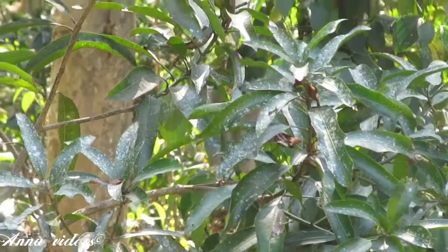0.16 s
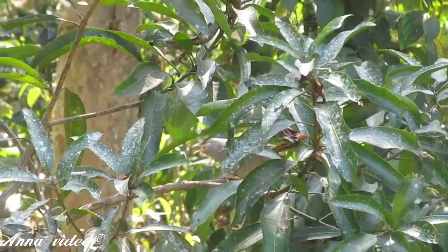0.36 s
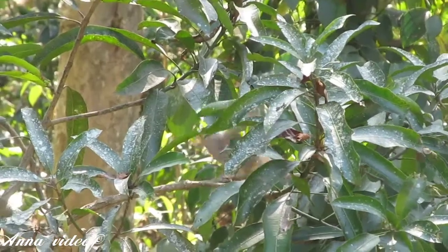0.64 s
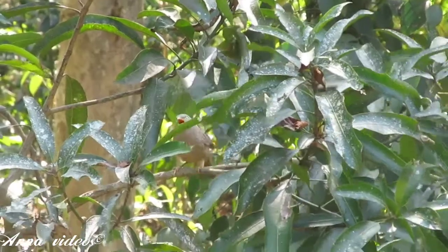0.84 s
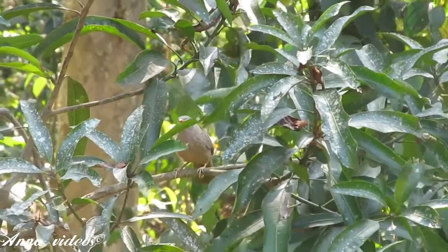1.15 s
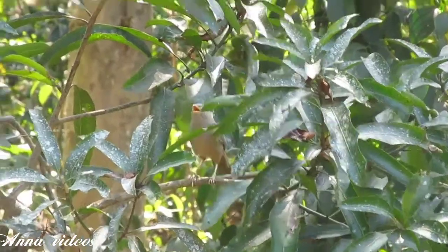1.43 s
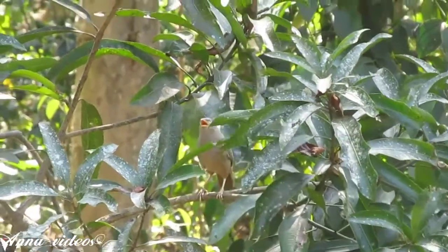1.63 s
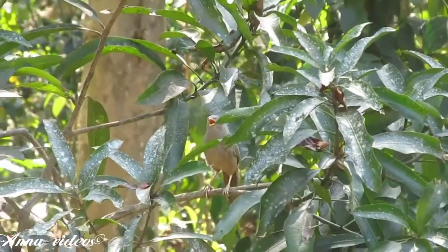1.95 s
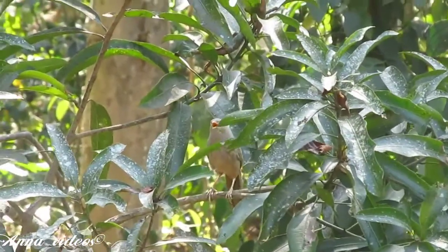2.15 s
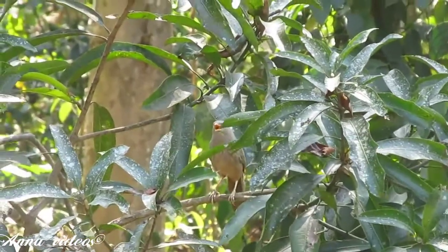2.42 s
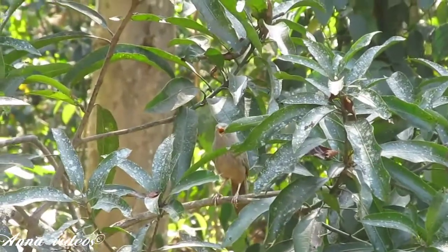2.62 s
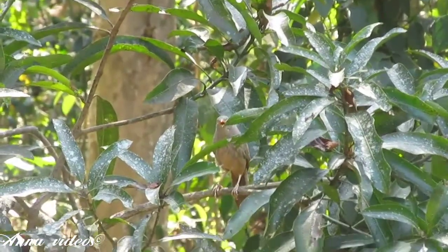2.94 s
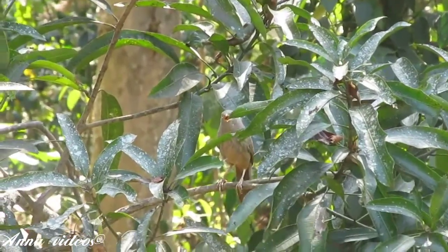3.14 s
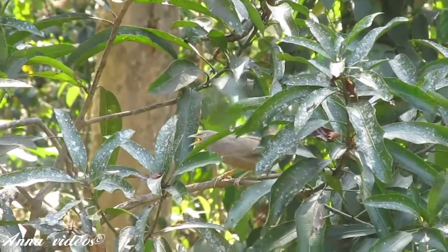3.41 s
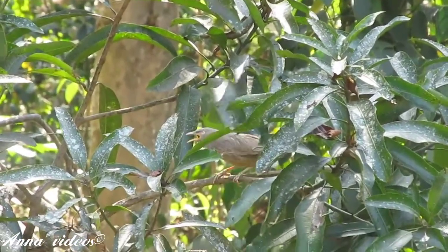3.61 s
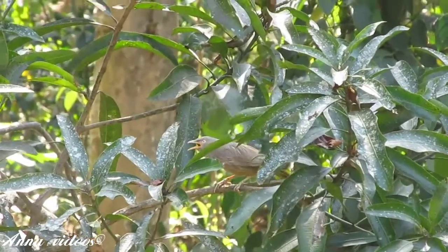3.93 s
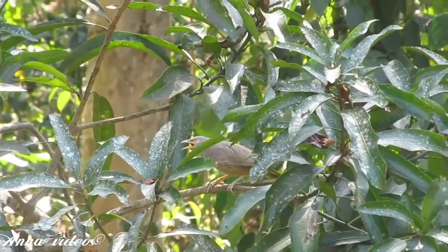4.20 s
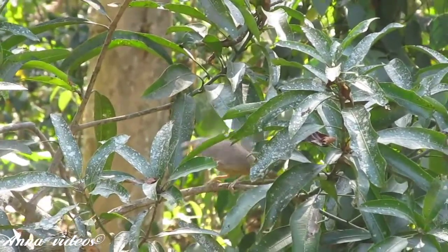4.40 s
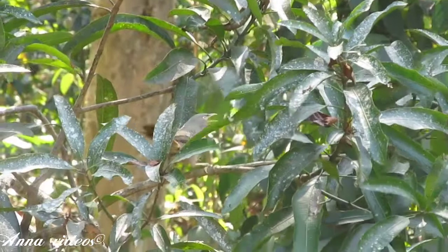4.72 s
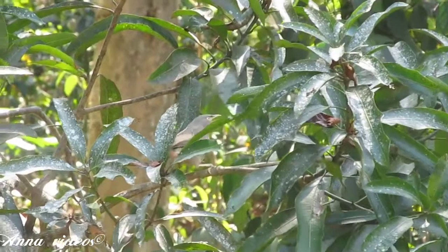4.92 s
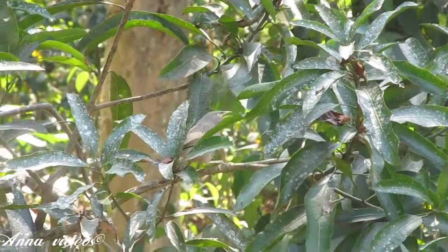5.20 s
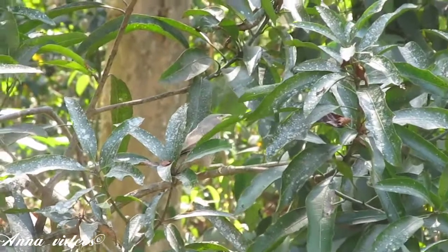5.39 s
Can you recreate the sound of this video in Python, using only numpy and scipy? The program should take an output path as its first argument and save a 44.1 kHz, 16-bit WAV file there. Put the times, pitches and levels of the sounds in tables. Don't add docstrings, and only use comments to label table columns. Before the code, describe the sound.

Outdoor stereo camera sound of one agitated bird: hoarse and ringing notes with overtones, quick scratchy chatter, a tiny twig tick, five slower grating rasps with a low squawk, then strong whistles again and a fast chatter run. Faint gritty ghost tones cling to the calls. Soft traffic rumble and airy hiss continue; a far crow and rasp close it.

```python
import sys
import numpy as np
from scipy import signal
from scipy.fft import rfft, irfft
from scipy.io import wavfile
from scipy.ndimage import uniform_filter1d

SR = 44100
rng = np.random.default_rng(int(sys.argv[2]) if len(sys.argv) > 2 else 0)


def amplitude_ratio(level_db):
    exponent = np.asarray(level_db, float) / 20
    return 10 ** exponent


def store_wav(level_fs):
    pcm = np.round(np.clip(np.atleast_2d(level_fs), -1, 1) * 32767)
    wavfile.write(sys.argv[1], SR, pcm.T.astype(np.int16))


N = 244755
T = np.arange(N) / SR

# (start [s], length [s], top pitch [Hz], level [dB], rise time [s])
LONG = [
    (.630, .136, 2323, -13, .018),
    (4.516, .1, 2388, -12, .013),
]
RINGING = [
    (.843, .074, 2362, -12, 0.01065),
    (1.330, .087, 2295, -13, 0.00944),
]
SLIDING = [
    (3.438, .068, 2392, -12.5, .021),
    (3.775, .078, 2382, -13.5, .021),
]
FLAT = [
    (3.612, .075, 2158, -19, .017),
]
LAST = [
    (4.698, .051, 2258, -22, .009),
]
HOARSE = [
    (.291, .117, 2458, -13.5, .015),
]
CHIRP = [
    (.502, .045, 2139, -27.5, .02),
]
SQUAWK = [
    (2.648, .095, 1590, -23.5, .01),
]
CLUCKS = [
    (1.011, 0.0221, 1398, -32.5, 0.0087),
    (4.295, .031, 1484, -33, 0.01175),
    (4.421, .032, 1493, -31, .014),
]
KINDS = [LONG, RINGING, SLIDING, FLAT, LAST, HOARSE, CHIRP, SQUAWK, CLUCKS]

# (rise [share 0-1], sag [share 0-1], sag exponent, closing slur against note level [dB])
PITCH_ARCH = [(.32, .05, 2.8, -9.5), (.32, .06, 1.5, -6), (.3, .05, 2.993, -9), (.31, 0.02, 2.49, -4),
              (.24, .07, 2.5, -2), (0.31, .08, 2.4, -10.5), (.24, .16, 2.3, 2.5), (0.04, .1, 2.5, -6.5),
              (0.4, .05, 2.407, -6)]
# (first [dB], second [dB], third [dB], fourth [dB])
HELD_PARTIALS = [(0, 0.0031, 1.5, 8.5), (1, 0, 4, 17.5), (-3.5, 0, 0.5, 7), (0, 0.0061, -0.5, -1.5),
                 (6, 0.0044, 7, 9.5), (-1.5, 0, 4, 0), (-2.5, 0.0062, -6, -11.5), (-3.75, 0, -6, -9.5),
                 (1, 0.01, -7.5, -7.5)]
PITCH_ROUGHNESS = [.002, .002, .006, .005, .004, .014, .01, .028, .012]
# (loudest moment [share 0-1], start below peak [dB], end below peak [dB])
BREATH_EFFORT = [(0.87, 8.5, 2), (0.54, 9, 4), (0.85, 10.5, -0.5), (0.61, 6.5, 6), (0.5, 2, 2),
                 (0.29, 6.5, 5), (0.42, -4, -3.5), (0.12, 1, 9.5), (0.8, 8, 10.5)]

# (start [s], length [s], peak level [dB], centre [Hz], loudest moment [share 0-1])
RASPS = [(.045, 0.191, -26, 4131, 0.73), (.273, 0.0368, -16.5, 4400, 1), (1.837, 0.1916, -23, 4290, 0.71),
         (2.099, 0.1214, -27.5, 4240, 0.47), (2.316, 0.178, -22.5, 4090, 0.53),
         (2.579, 0.194, -22, 4607, 0.4), (2.834, .146, -24.5, 4129, 0.51),
         (3.104, 0.1805, -23.5, 4056, 0.59), (3.358, 0.1207, -16, 4550, 1), (3.59, 0.058, -22, 4779, 0.92)]
CHATTER = [(1.01, 0.0572, -22, 4750, 0.31), (1.128, 0.052, -25.5, 4920, 0.28),
           (1.228, 0.0699, -24, 4910, 0.587), (1.505, 0.0549, -23, 4590, 0.33),
           (1.632, 0.0465, -32, 4670, 0.29), (3.945, 0.0559, -24.5, 4830, 0.32),
           (4.053, 0.061, -25.5, 4890, 0.39), (4.175, 0.0578, -27, 4760, 0.488),
           (4.3, 0.0613, -26.5, 4860, 0.3015), (4.428, 0.0564, -26, 4810, 0.44),
           (4.72, 0.0747, -27, 4500, 0.9), (4.845, 0.0497, -28.5, 4860, 0.3)]
FAR_RASP = [
    (5.03, 0.107, -53, 4056, 0.173),
]

# (frequency [Hz], level [dB])
THROAT = [(800, -24), (1500, -15.5), (2300, -4.5), (3300, -11), (4500, 4.5), (5800, 0.5), (7000, -17),
          (9500, -27.5), (14000, -25.5)]
RASP_TINT = [(900, -15), (1400, -7), (1950, 0.5), (2500, -7), (3080, -7), (3500, -10.5), (4200, -3.5),
             (4900, -10.5), (5700, -8.5), (6600, -31), (9000, -25.5), (15000, -47.5)]
CHATTER_TINT = [(900, -14.5), (1500, -6.5), (3000, -6), (3800, -8.5), (5000, 4.5), (6600, -4),
                (7700, -17.5), (15000, -24.5)]

# (time [s], peak level [dB])
TWIG_TICKS = [
    (1.7855, -28),
]
# (time [s], level [dB])
CROW_LEVEL = [(5.11, -46.5), (5.156, -38), (5.2, -44), (5.224, -46.5), (5.428, -58.5), (5.436, -70),
              (5.45, -64)]

# (frequency [Hz], level per Hz [dB])
GARDEN_SPECTRUM = [(15, -47), (25, -22), (148, -2.5), (183, -2.5), (289, -6.5), (378, -5), (614, -15.5),
                   (703, -15), (1080, -18), (1170, -19), (1530, -17.5), (3260, -18.5), (15500, -36.5)]
# (time [s], level [dB])
BACKGROUND_LEVEL = [(0, -0.5), (.3, -1), (3, 0.5), (5.55, 0.5)]
# (frequency [Hz], level [dB])
HUMS = [(378, -54.5), (1147, -59.5), (7865, -67.5)]
# (time [s], level [dB])
WIND_PUFFS = [
    (3.951, -40.5),
]

# (frequency [Hz], left minus right [dB])
PORT_DIFFERENCE = [(60, 0.5), (110, -6), (200, -3), (380, -2.5), (700, -2.5), (1290, -1.5), (2380, -8),
                   (4400, -1.5), (8120, -10), (15000, -4.5)]
# (frequency [Hz], level [dB])
GHOST_TINT = [(1000, -21.5), (2300, -4.5), (4500, 0), (7000, 1), (9000, -31.5)]
WHINE_LEVELS = [-19.5, -26, -29, -36]


def curve(table, hz):
    f, v = np.transpose(table)
    return np.interp(np.log(np.maximum(hz, 1)), np.log(f), v)


def tint(x, table):
    n = x.shape[-1]
    gain = amplitude_ratio(curve(table, np.fft.rfftfreq(n, 1 / SR)))
    return irfft(rfft(x) * gain, n)


def unit(x):
    return x / np.sqrt(np.mean(x ** 2))


def wobble(n, hz):
    lowpass = signal.butter(2, hz, fs=SR, output="sos")
    return unit(signal.sosfilt(lowpass, rng.standard_normal(n)))


def effort(start, length, peak_db, crest, swell_db, fall_db):
    at = np.arange(int(start * SR), int((start + length) * SR))
    u = (T[at] - start) / length
    crest = np.clip(crest, .05, .98)
    before = swell_db * (1 - u / crest) ** 2
    after = fall_db * ((u - crest) / (1 - crest)) ** 2
    return at, peak_db - np.where(u < crest, before, after)


def notes(slur_s=.036, slur_drop=.62, tilt_db=-4.0, shimmer_db=.7, hoarse=.16, leak_db=-22):
    out = np.zeros(N)
    k = np.arange(1, 8)[:, None]
    breath = unit(tint(rng.standard_normal(N), CHATTER_TINT))
    u = np.arange(int(slur_s * SR)) / (slur_s * SR)
    manners = zip(KINDS, PITCH_ROUGHNESS, PITCH_ARCH, BREATH_EFFORT, HELD_PARTIALS)
    for rows, rough, (rise, sag, sag_power, slur_db), push, held_db in manners:
        for start, length, top_hz, peak_db, rise_s in rows:
            at, push_db = effort(start, length, peak_db, *push)
            held = len(at)
            t = T[:held]
            leap = rise * np.exp(-(t / rise_s) ** 1.25)
            hz = top_hz * (1 - leap - sag * (t / length) ** sag_power)
            hz = np.r_[hz, hz[-1] * (1 - slur_drop * np.tanh((u / .3) ** 1.3))]
            span = slice(at[0], at[0] + len(hz))

            colour_db = curve(THROAT, k * hz) + tilt_db * np.log2(k)
            db = colour_db + peak_db + slur_db + 6.5
            db[:, :held] = colour_db[:, :held] - colour_db[1, :held].max() + push_db
            db[:, :held] += np.r_[held_db, [min(held_db[3], 0)] * 3][:, None]
            db[3:, :held] -= 7 * np.exp(-(t / (2 * rise_s)) ** 2)
            db[2, :held] += 6.5 * np.exp(-t / .0122 - ((3 * hz[:held] - 5317) / 380) ** 2)
            db[1:] += 1.5 * wobble(N // 10, 35)[-len(hz):]
            db = uniform_filter1d(db, 120, axis=1, mode="nearest")

            drift = np.r_[rough + .012 * np.exp(-t / .015), rough + hoarse * u ** 2]
            drift = drift * wobble(len(hz), 220)
            phase = 2 * np.pi * np.cumsum(hz * (1 + drift)) / SR
            shimmer = shimmer_db + 50 * rough
            db += np.array([shimmer * min(j, 2) * wobble(len(hz), 169) for j in k[:, 0]])
            whistle = np.sqrt(2) * np.sum(amplitude_ratio(db) * np.sin(k * phase), axis=0)
            leak = amplitude_ratio(leak_db + db[1]) * breath[span]
            gate = np.r_[np.minimum(np.arange(held) / 420, 1), (1 - u) ** .8]
            out[span] += gate * (whistle + leak)
    return out


def harsh(rows, colour, jitter, clean_db, pulse_hz, scatter_db, fade_s, swell_db, fall_db, low_db):
    clicks = (rng.random(N) < pulse_hz / SR) * amplitude_ratio(scatter_db * rng.standard_normal(N))
    chop = unit(uniform_filter1d(uniform_filter1d(clicks, 30), 30) + .03)
    spray = clicks * rng.choice([-1, 1], N) + .3 * rng.standard_normal(N)
    spray = tint(spray, colour)
    low = unit(signal.sosfilt(signal.butter(4, 3300, fs=SR, output="sos"), spray))
    high = unit(signal.sosfilt(signal.butter(4, 3300, "high", fs=SR, output="sos"), spray))
    out = np.zeros(N)
    for start, length, peak_db, centre_hz, crest in rows:
        at, db = effort(start, length, peak_db, crest, swell_db, fall_db)
        edge = np.clip(np.minimum(T[at] - start, start + length - T[at]) / fade_s, 0, 1)
        push = db - peak_db
        hz = centre_hz * (1 - .0028 * push)
        phase = np.pi * np.cumsum(hz * (1 + jitter * wobble(len(at), 465.6))) / SR
        tone = amplitude_ratio(clean_db + .93 * push) * chop[at]
        upper = high[at] + tone * (np.sin(2 * phase) + amplitude_ratio(-17) * np.sin(3 * phase))
        lower = low[at] + amplitude_ratio(-13) * tone * np.sin(phase)
        lower = amplitude_ratio(low_db + .566 * (db + 28)) * lower
        out[at] += edge * amplitude_ratio(-3.5) * (amplitude_ratio(db) * upper + lower)
    return out


def rasps():
    return harsh(RASPS, RASP_TINT, jitter=.036, clean_db=3.0, pulse_hz=2000, scatter_db=2.0,
                 fade_s=.02, swell_db=8, fall_db=8.5, low_db=-33)


def chatter():
    return harsh(CHATTER, CHATTER_TINT, jitter=.06, clean_db=-2.0, pulse_hz=2500, scatter_db=2.0,
                 fade_s=.012, swell_db=14.5, fall_db=19, low_db=-29.5)


def twig(t60=0.0214):
    out = np.zeros(N)
    for s, db in TWIG_TICKS:
        i = int(s * SR)
        out[i:i + 600] += amplitude_ratio(db - 60 * T[:600] / t60) * rng.standard_normal(600)
    return tint(out, [(500, -28), (1500, 7.5), (6000, 2), (9000, -17), (15000, -30)])


def far_rasp():
    return harsh(FAR_RASP, RASP_TINT, jitter=0.0415, clean_db=11.5, pulse_hz=1520, scatter_db=-4.5,
                 fade_s=0.024, swell_db=-0.5, fall_db=7.5, low_db=-31)


def crow(pulse_hz=151.0, throat_hz=1850, width_hz=110):
    s, level_db = np.transpose(CROW_LEVEL)
    at = np.arange(int(s[0] * SR), int(s[-1] * SR))
    edge = np.clip(np.minimum(T[at] - s[0], s[-1] - T[at]) / 0.0134, 0, 1)
    phase = np.cumsum(pulse_hz * (1 + 0.0082 * wobble(len(at), 53))) / SR
    pulses = np.diff(np.floor(phase), prepend=0) + 0.056 * rng.standard_normal(len(at))
    throat = signal.butter(2, [throat_hz - width_hz, throat_hz + width_hz], "band", fs=SR, output="sos")
    chest = signal.butter(2, [1280, 1480], "band", fs=SR, output="sos")
    voice = unit(signal.sosfilt(throat, pulses)) + amplitude_ratio(-7) * unit(signal.sosfilt(chest, pulses))
    out = np.zeros(N)
    out[at] = edge * amplitude_ratio(np.interp(T[at], s, level_db)) * voice
    return out


def foliage(x, direct, leaves_db, leaves_t60, walls_db, walls_t60):
    t = T[:SR]
    leaves = rng.standard_normal((2, SR)) * amplitude_ratio(-60 * t / leaves_t60) * np.minimum(t / 0.0039, 1)
    walls = tint(rng.standard_normal((2, SR)),
                 [(500, 11.5), (2000, -0.5), (5000, 0), (8000, -2.5), (15000, -20.5)])
    walls = walls * amplitude_ratio(-60 * t / walls_t60) * np.minimum(t / 0.00856, 1)
    echo = amplitude_ratio(leaves_db) * unit(leaves) + amplitude_ratio(walls_db) * unit(walls)
    return direct * x + signal.fftconvolve(x[None], echo / np.sqrt(SR), axes=1)[:, :N]


def garden():
    mid, left, right = (tint(rng.standard_normal(N), GARDEN_SPECTRUM) for _ in range(3))
    shared = tint(mid, [(100, -2), (400, -3.5), (900, -1.0), (2000, -13.5), (15000, -31.5)])
    own = tint(np.array([left, right]), [(60, -4), (300, -10.0), (900, 2.0), (2000, 4.5), (4500, 1.5),
                                         (5600, 5.5), (6300, -1.5), (15000, -9.5)])
    swell_db = np.interp(T, *np.transpose(BACKGROUND_LEVEL)) + 0.206 * wobble(N, 3.1)
    out = unit(shared + own) * amplitude_ratio(-40.5 + swell_db)
    for hz, db in HUMS:
        level = np.sqrt(2) * amplitude_ratio(db + 0.53 * wobble(N, 7.5))
        out = out + level * np.sin(2 * np.pi * hz * T + 0.19 * wobble(N, 3.5))
    rumble = unit(tint(rng.standard_normal(N), [(20, -3.5), (50, 5), (120, -2), (400, -37)]))
    puffs = sum(amplitude_ratio(db) * np.exp(-((T - s) / 0.027) ** 2) for s, db in WIND_PUFFS)
    return out + puffs * rumble


def scene():
    bird = foliage(notes() + rasps() + chatter() + twig(), 0.8204,
                   leaves_db=-6.5, leaves_t60=0.1394, walls_db=-10.0, walls_t60=0.66)
    far = foliage(crow() + far_rasp(), 0.75,
                  leaves_db=-5, leaves_t60=0.194, walls_db=1.0, walls_t60=0.505)
    return bird + far + garden()


def ports(dry):
    half = np.array(PORT_DIFFERENCE) * [1, .5]
    x = np.array([tint(dry[0], half), tint(dry[1], half * [1, -1])])
    x[0] = np.roll(x[0], 1)
    return x


def whine_ghosts(x, whine_hz=3891):
    leads = np.array([.06 * wobble(N, 40) + lead for lead in (0, .22)])
    turn = 2 * np.pi * whine_hz * T + leads
    whine = sum(2 * amplitude_ratio(db) * np.cos((k + 1) * turn) for k, db in enumerate(WHINE_LEVELS))
    whine = whine + amplitude_ratio(-21) * rng.standard_normal((2, N))
    return tint(tint(x, GHOST_TINT) * whine,
                [(700, 0), (3000, -1.0), (6200, 0.0), (8500, -1.0), (12000, 2.5), (16000, 1.0)])


def top_cut(x):
    return signal.sosfilt(signal.butter(12, 15930, fs=SR, output="sos"), x)


def record(dry):
    x = ports(dry)
    x = x + whine_ghosts(x)
    x = x / (1 + (x / .86) ** 6) ** (1 / 6)
    x = tint(x, [(15500, 0), (15900, -8), (16100, -60)])
    return top_cut(x)


dry = scene()
out = record(dry)
store_wav(out)
```